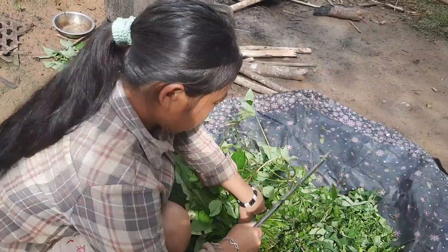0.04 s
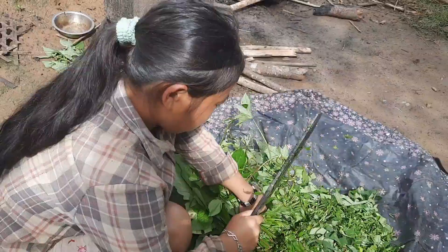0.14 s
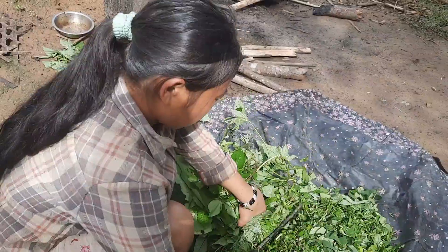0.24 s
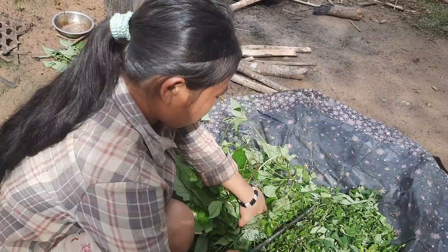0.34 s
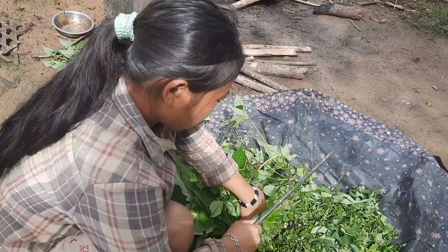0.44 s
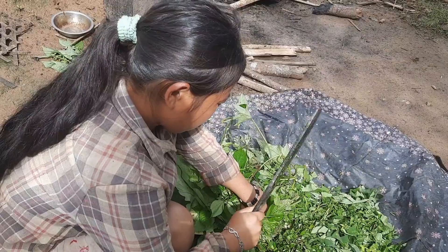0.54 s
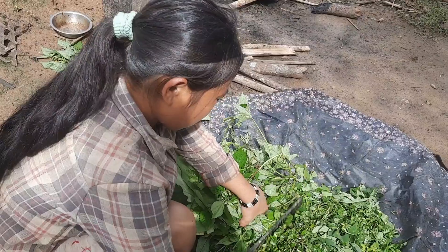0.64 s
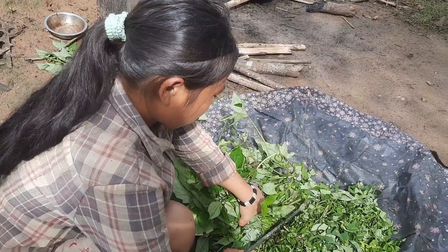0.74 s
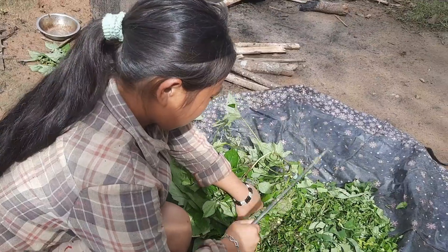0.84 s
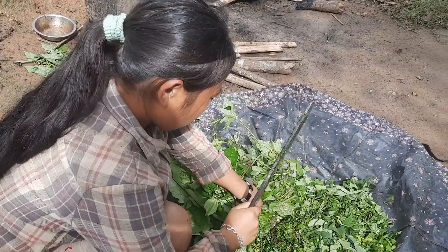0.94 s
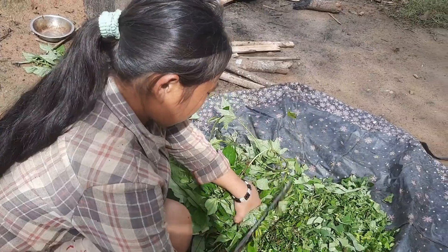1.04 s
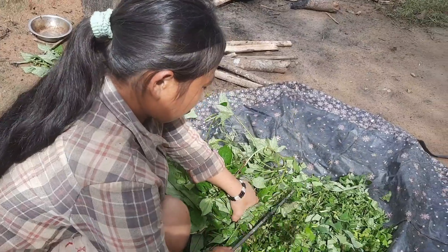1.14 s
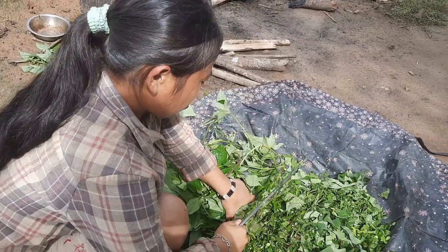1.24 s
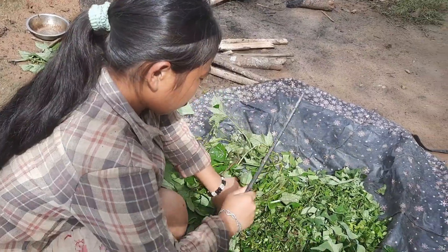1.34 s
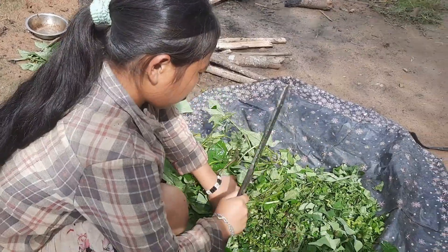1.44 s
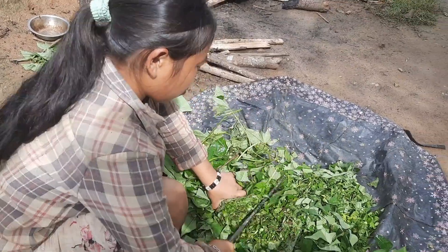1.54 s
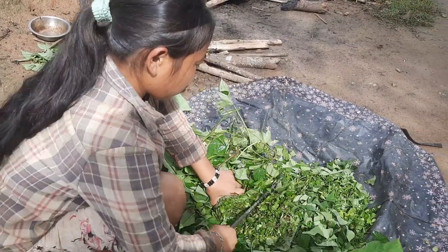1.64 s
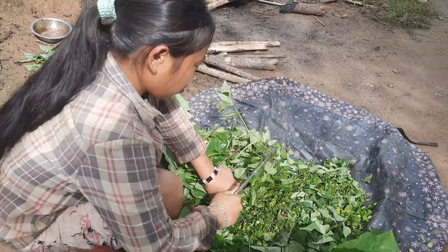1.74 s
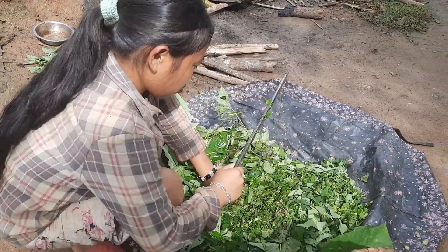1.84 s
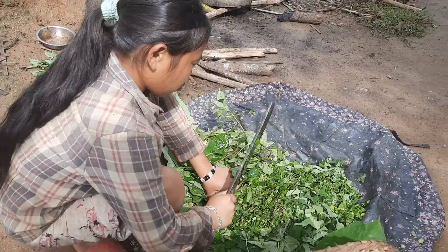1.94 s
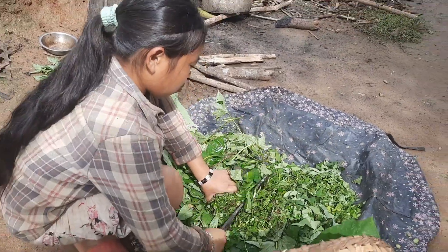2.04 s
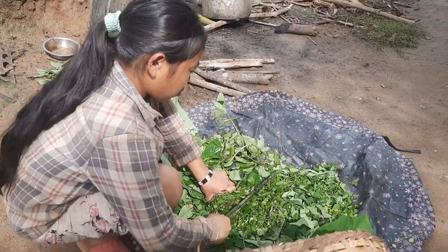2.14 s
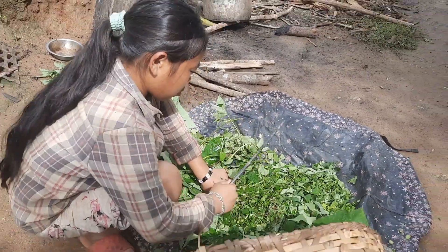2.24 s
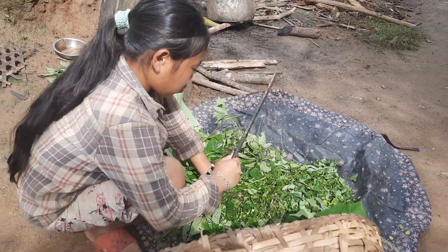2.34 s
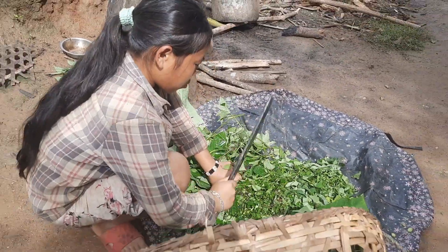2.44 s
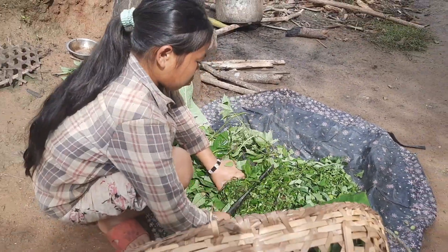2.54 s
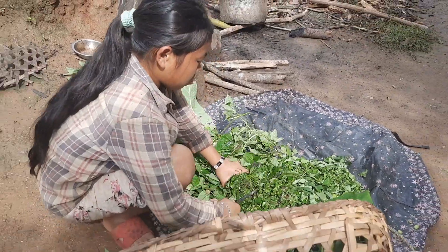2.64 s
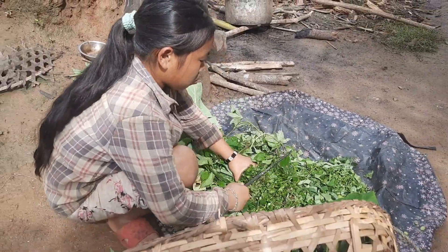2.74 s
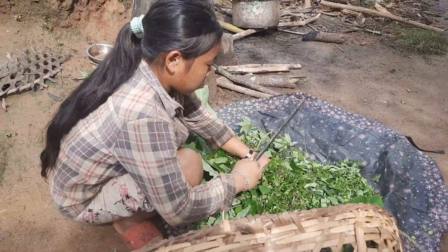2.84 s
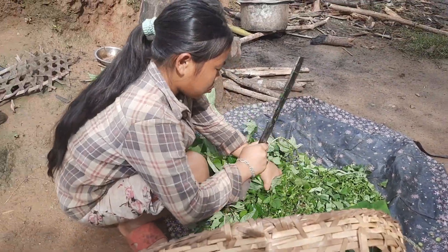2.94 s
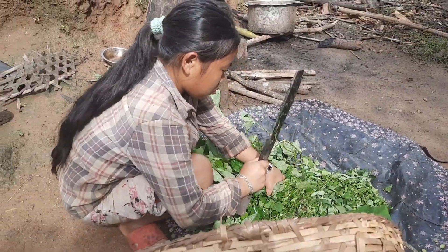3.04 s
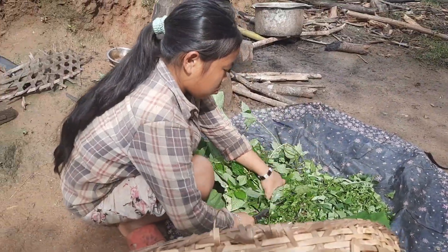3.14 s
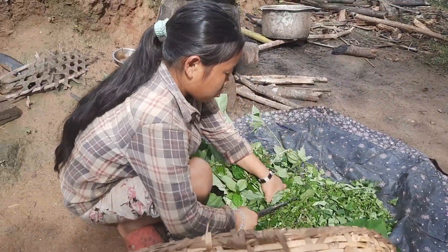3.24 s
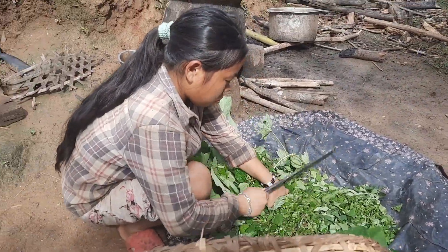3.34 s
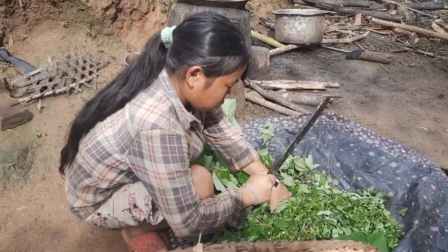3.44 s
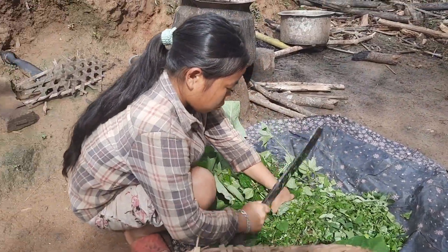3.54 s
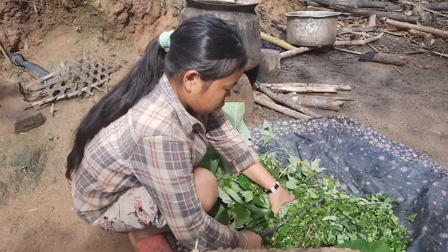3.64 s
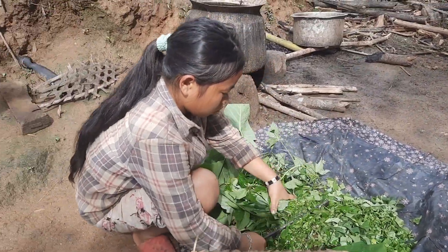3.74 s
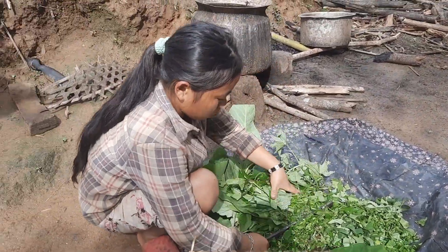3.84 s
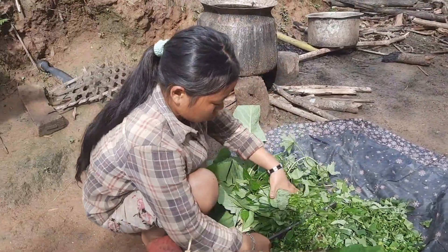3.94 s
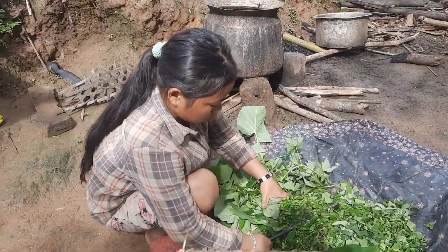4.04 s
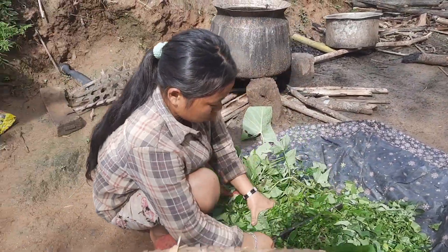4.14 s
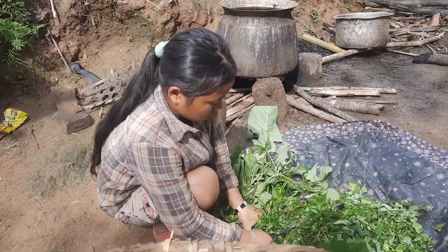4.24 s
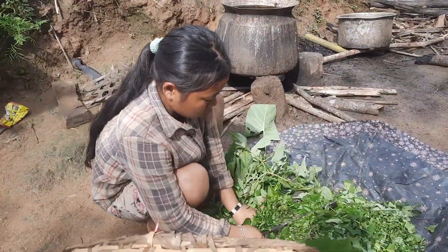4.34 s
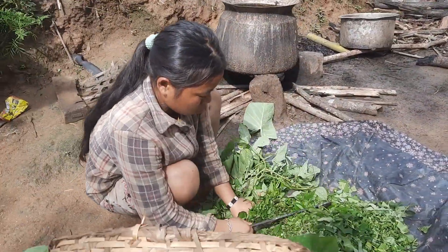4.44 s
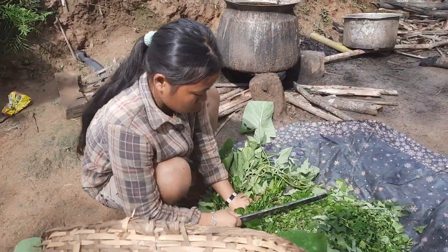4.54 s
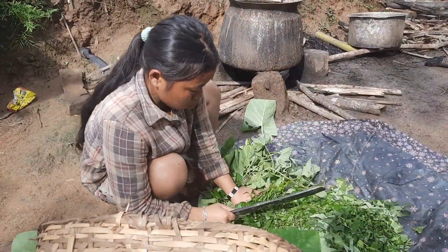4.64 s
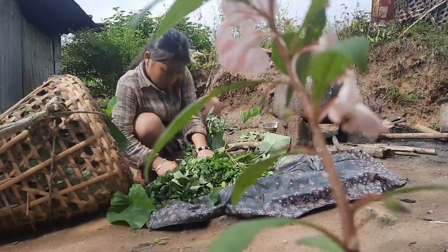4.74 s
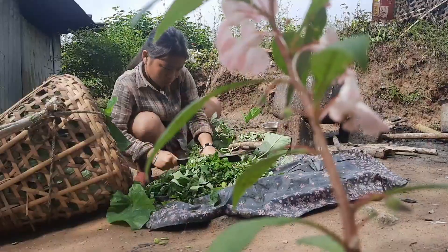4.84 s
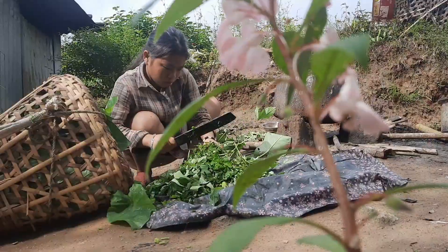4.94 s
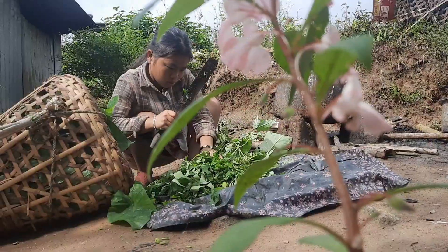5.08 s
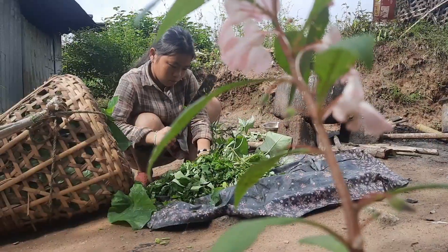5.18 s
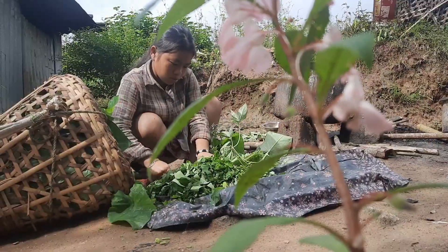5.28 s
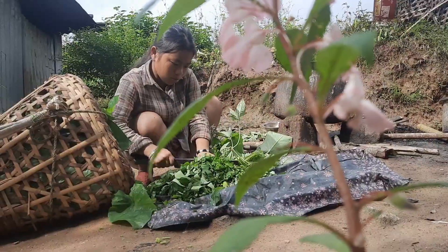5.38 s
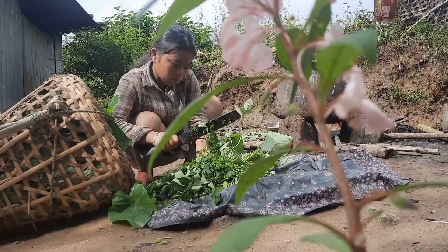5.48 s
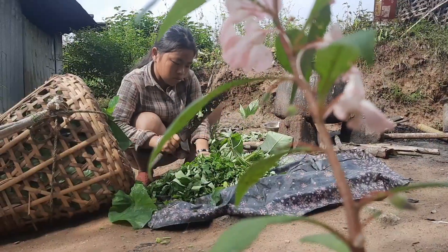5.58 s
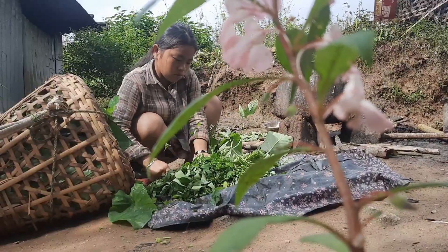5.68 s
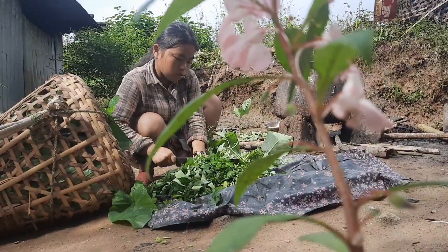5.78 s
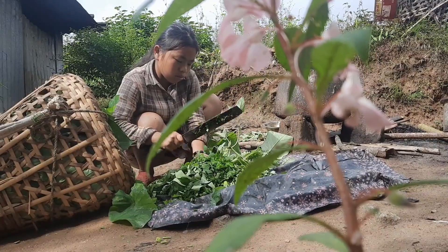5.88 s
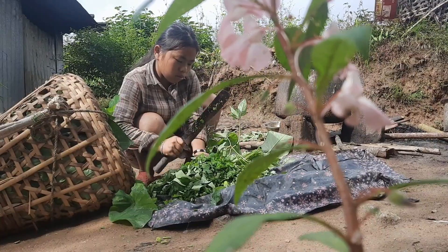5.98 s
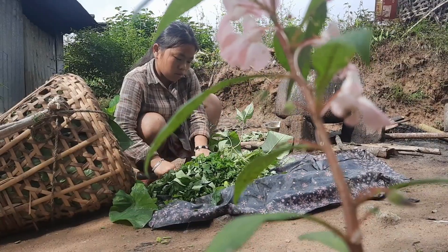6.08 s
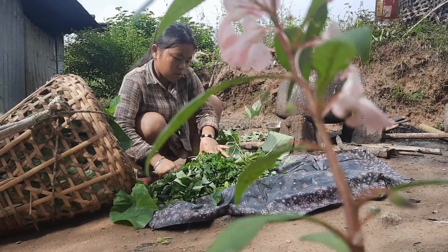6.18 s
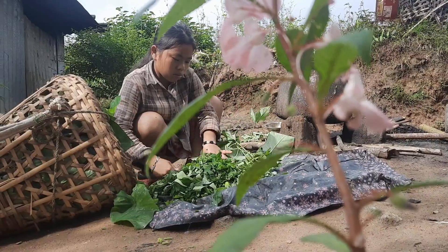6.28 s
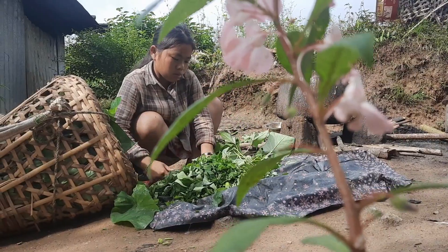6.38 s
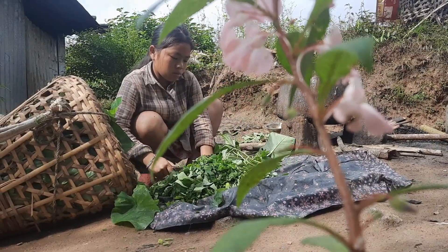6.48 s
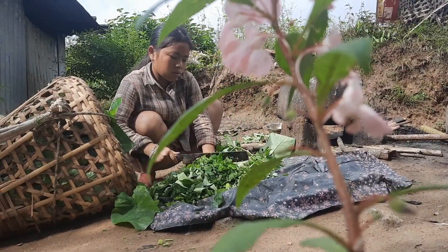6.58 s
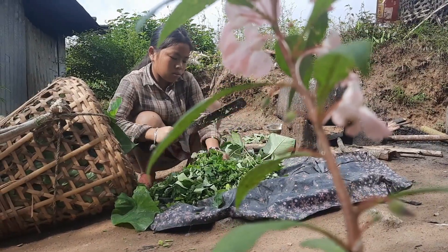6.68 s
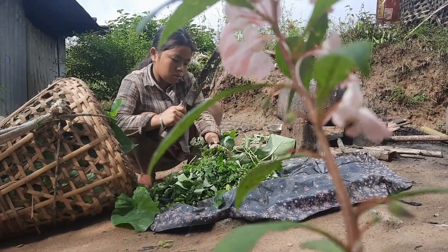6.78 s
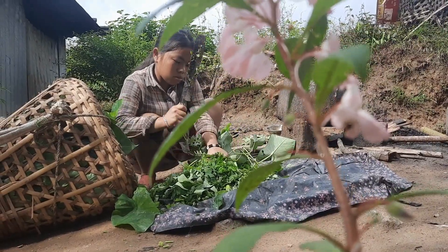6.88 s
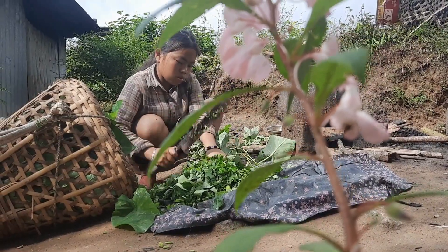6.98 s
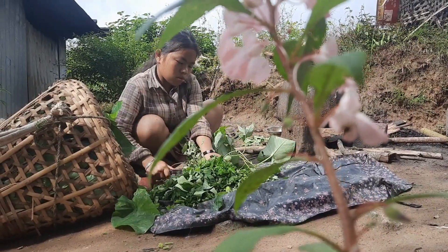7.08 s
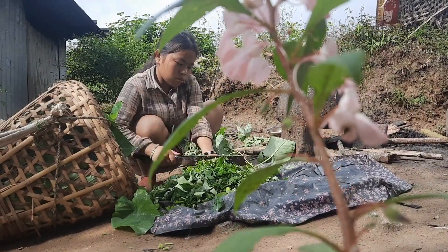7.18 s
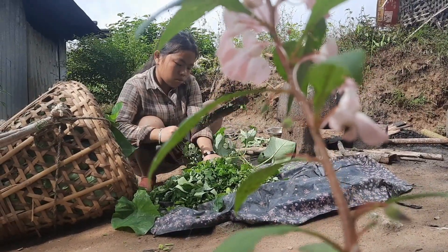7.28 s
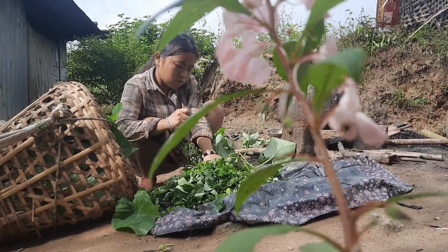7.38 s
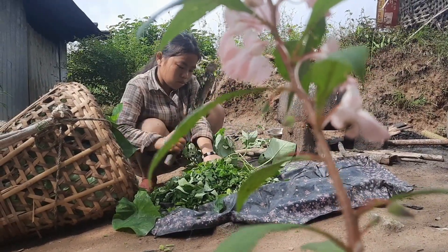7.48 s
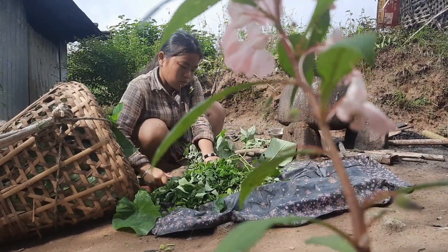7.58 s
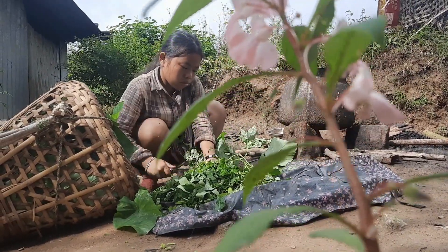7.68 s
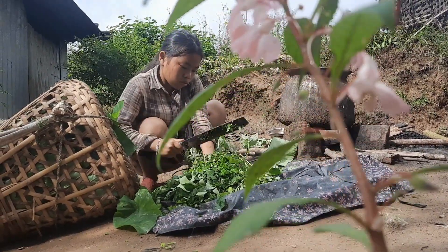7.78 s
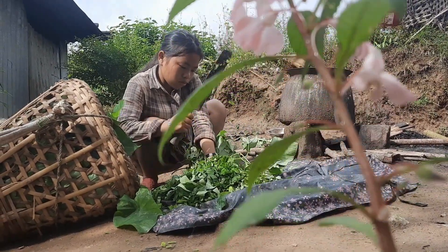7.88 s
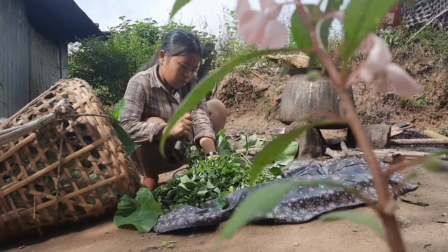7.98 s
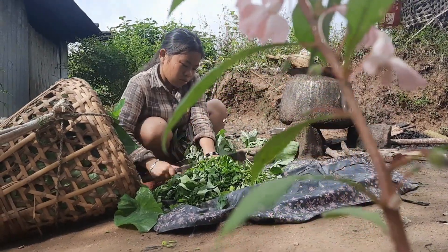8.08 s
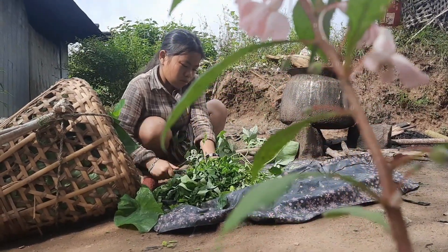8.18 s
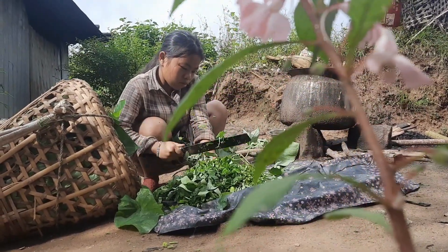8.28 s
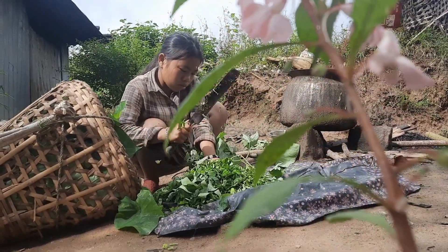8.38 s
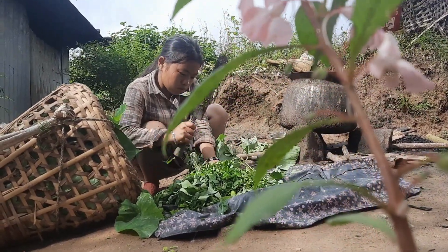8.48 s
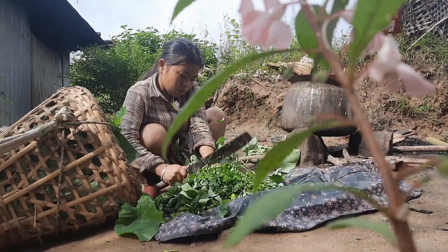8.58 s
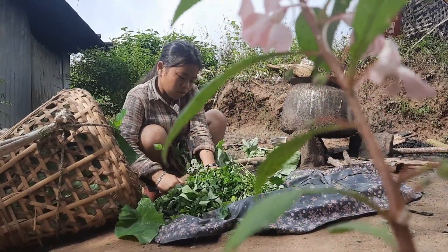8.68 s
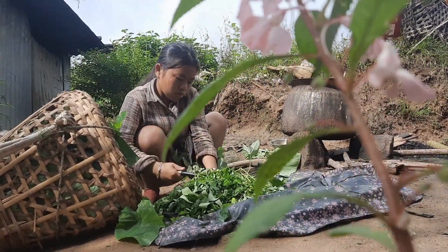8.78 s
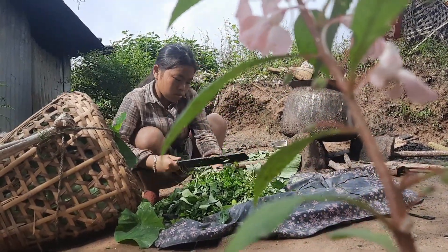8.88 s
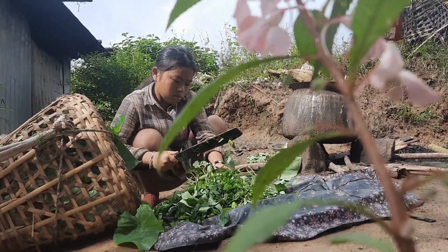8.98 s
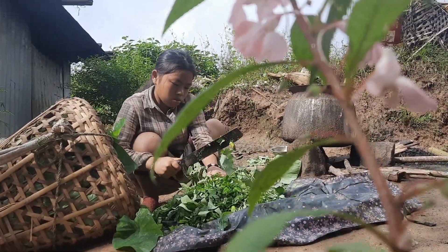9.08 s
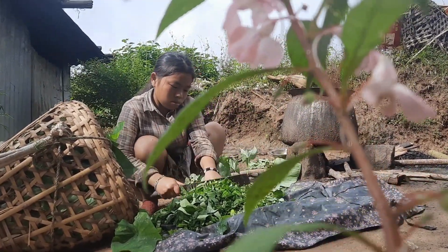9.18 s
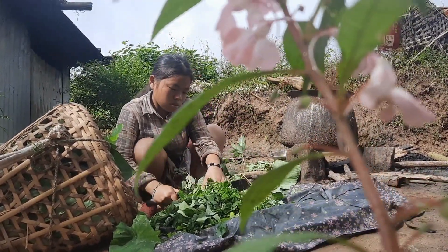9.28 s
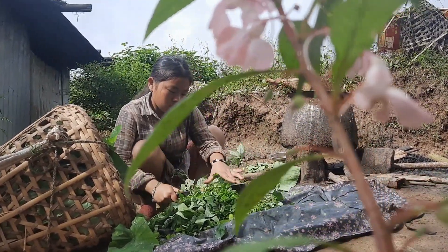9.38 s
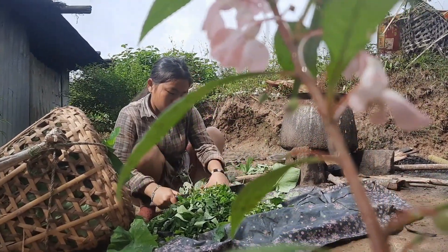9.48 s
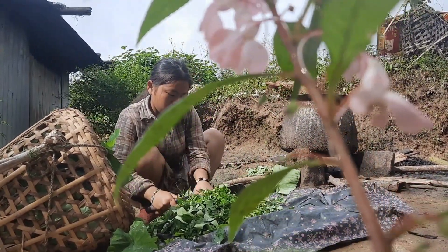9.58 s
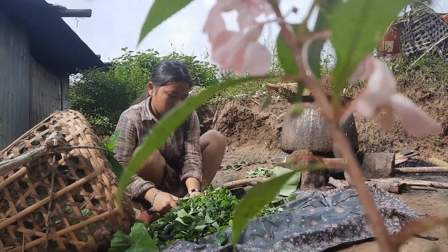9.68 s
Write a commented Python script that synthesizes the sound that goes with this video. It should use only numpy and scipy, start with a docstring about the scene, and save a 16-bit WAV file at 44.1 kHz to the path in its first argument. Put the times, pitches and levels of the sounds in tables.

```python
"""A long blade chops leafy stalks on a wooden board on a sheet, outdoors; air, insects and a low hum fill the yard.
First come nine strokes: filtered crackle crunches, damped sines ring board and blade, and cut leaves scatter.
A hand drags and rustles the heap between them too, more from about 4 s: swelling crackle, short ringing snaps,
and noise in narrow rings for the rubbed blade. At 4.65 s the microphone's lower, farther place recolours board,
blade scrape and heap. Three strokes follow from 5.4 s, four from 7.1 s, then the heap is moved to the end."""
import sys
import numpy as np
from scipy import signal
from scipy.fft import rfft, irfft, next_fast_len
from scipy.io import wavfile

SR = 44100
rng = np.random.default_rng(int(sys.argv[2]) if len(sys.argv) > 2 else 0)


def store_wav(level_fs):
    """Save 16-bit WAV to argv[1]."""
    pcm = np.round(np.clip(np.atleast_2d(level_fs), -1, 1) * 32767)
    wavfile.write(sys.argv[1], SR, pcm.T.astype(np.int16))


N = 428652
STEP = 16   # samples per step of the slow gain curves


def from_db(db):
    """Turn decibels into gain."""
    return 10 ** (np.asarray(db) / 20)


def rms_one(x):
    """Scale to an average (rms) strength of 1."""
    return x / np.sqrt(np.mean(x ** 2) + 1e-20)


def full(slow):
    """Stretch a slow gain curve to every sample."""
    return np.interp(np.arange(N) / STEP, np.arange(len(slow)), slow)


def at_hz(points, hz):
    """Read a table of (pitch, value) between its points, on a log pitch axis."""
    pitches, values = np.array(points).T
    return np.interp(np.log(hz), np.log(pitches), values)


def fft_hz(size):
    """Pitches of the spectrum bins, at least 1 Hz."""
    return np.maximum(np.arange(size // 2 + 1) * SR / size, 1)


def drift(rate_hz):
    """Slow random wandering of rms 1: noise smoothed by two equal low-pass stages."""
    r = np.exp(-2 * np.pi * STEP * rate_hz / SR)
    noise = rng.standard_normal(N // STEP + 3002)
    return rms_one(signal.lfilter([1], [1, -2 * r, r * r], noise)[3000:])   # drop the start-up


def ring(clicks, hz, t60):
    """A resonance: each unit click starts a sine of height 1 that loses 60 dB in t60 seconds."""
    r, w = from_db(-60 / (t60 * SR)), 2 * np.pi * hz / SR
    return signal.lfilter([0, np.sin(w)], [1, -2 * r * np.cos(w), r * r], clicks + 1e-18)


def mode(t, hz, t60):
    """One way a solid vibrates: a damped sine that swells during the contact."""
    contact_s = 0.00066
    t = np.maximum(t, 0)
    return (1 - np.exp(-t / contact_s)) ** 2 * from_db(-60 * t / t60) * np.sin(2 * np.pi * hz * t)


def narrow(source, hz, width_hz):
    """Pass a source twice through one resonance, then scale it to rms 1."""
    r = np.exp(-np.pi * width_hz / SR)
    stage = [0.94, 0.00049, -0.56, 1, -2 * r * np.cos(2 * np.pi * hz / SR), r * r]
    return rms_one(signal.sosfilt([stage] * 2, source))


def crackle(per_s, spread_db, hiss, count):
    """Uneven clicks of tearing fibres over hiss, in unrelated pairs of draws."""
    sizes = from_db(spread_db * np.minimum(rng.exponential(1, N), 4))
    born = rng.random(N) < per_s / SR
    strength = rms_one(rms_one(sizes * born) + hiss)
    return strength * rng.standard_normal((count, 2, N))


def swells(rows):
    """Each row rises 20 dB to its peak and falls 20 dB after it; powers add. One gain curve per level."""
    t, power = np.arange(N // STEP + 2) * STEP / SR, 0
    for peak_s, rise, fall, *levels_db in rows:
        away = np.maximum((peak_s - t) / max(rise, .005), (t - peak_s) / max(fall, .005))
        shape_db = -20 * np.minimum(away, 5)   # keeps going past 20 dB, down to 100 dB
        power = power + from_db(2 * (np.array(levels_db)[:, None] + shape_db))
    return np.sqrt(power)


# The knife strokes: (landing time [s], thud level [dB], high ring level [dB], knock level [dB],
#  low ring level [dB], hardness of bite [0-1], stalk crunch level [dB], leaf crunch level [dB],
#  scatter level [dB], blade pitch [Hz], dent pitch [Hz])
STROKES = [(0.1307, -33.5, -38, -27.5, -18, 0.23, -43, -44.5, -46, 616, 574),
           (0.347, -38.5, -35.5, -34, -33, 0.76, -33, -34, -43.5, 829, 302),
           (0.7479, -34.5, -22.5, -25, -16, 0.27, -28, -29.5, -41.5, 817, 313),
           (1.1528, -40.5, -32, -31, -25, 0.24, -28.5, -27.5, -42, 884, 298),
           (1.6339, -27.5, -10, -23.5, -19, 0.51, -42.5, -39, -39.5, 870, 312),
           (2.1009, -29, -12.5, -22.5, -13, 0.27, -48, -40, -45, 907, 312),
           (2.607, -29.5, -14, -24.5, -18, 0.4, -36, -37.5, -40, 768, 320.5),
           (3.24, -28, -13.5, -26, -17.5, 0.19, -42, -37.5, -43, 940, 321.3),
           (3.6965, -28.5, -15, -22.5, -9, 0.64, -38.5, -40.5, -40.5, 971, 312),
           (5.3571, -31.5, -22.5, -20, -23.5, 0.44, -39.5, -45, -49.5, 1165, 397),
           (5.776, -66.5, -34.5, -45.5, -40.5, 0.27, -42, -41, -46.5, 1280, 587),
           (6.1542, -30.5, -19.5, -23, -18.5, 0.19, -39, -49, -46.5, 614, 429),
           (7.1266, -37.5, -33, -36, -49.5, 0.28, -35, -38.5, -43, 695, 339.5),
           (7.6643, -27, -15, -20, -27.5, 0.44, -35.5, -44.5, -44, 1223, 483),
           (8.1979, -29.5, -19.5, -22, -33, 0.38, -34.5, -41.5, -43, 607, 448),
           (8.714, -27.5, -17.5, -19.5, -29, 0.44, -33, -46, -44, 563, 417)]
EDGE_DB, CRACK_DB = -7, -19   # edge modes and crack, over the high ring level


def strokes(name):
    """One named quantity for all strokes."""
    names = "s thud high knock low bite stalk leaf scatter blade_hz dent_hz".split()
    named = dict(zip(names, np.transpose(STROKES)))
    named.update(edge=named["high"] + EDGE_DB, crack=named["high"] + CRACK_DB)
    return named[name]


def dying(name, t60):
    """Each landing starts a gain that fades by 60 dB in t60 seconds."""
    train = np.zeros(N // STEP + 2)
    train[np.round(strokes("s") * SR / STEP).astype(int)] = from_db(strokes(name))
    return signal.lfilter([1], [1, -from_db(-60 * STEP / (t60 * SR))], train)


# Colour of the still air: (pitch [Hz], level per Hz [dB]); only its shape counts
AIR_COLOUR = [(18, -37.5), (30, -9), (90, 1), (131, 2.5), (221, -11), (295, -4.5), (760, -15.5),
              (1160, -18.5), (3580, -24), (6900, -16.5), (9460, -26), (14800, -19.5), (16000, -42)]
AIR_DB = -73
# Insect voices: (pitch [Hz], resonance width [Hz], level at start [dB], level at end [dB])
INSECT_BANDS = [(5400, 630, -82, -87.5), (7000, 550, -87.5, -97), (8270, 250, -84, -96),
                (11010, 420, -96.5, -93)]
# Swells of rumble, low hum and rubbed blade: (peak time [s], rise [s], fall [s], level [dB])
RUMBLE_SWELLS = [(4.192, 0.15, 0.046, -49.5), (4.34, 0.12, .3, -63), (4.712, 0.045, 0.11, -61.5),
                 (9.71, .06, 0.08, -65.5)]
LOW_HUM_SWELLS = [(4.043, .3, 0.51, -66), (4.338, 0.27, 0.16, -57), (7.021, 0.14, .2, -69)]
BLADE_RUB_SWELLS = [(1.0, .1, 0.053, -68), (1.5, .3, 0.11, -74.5), (5.12, .2, 0.29, -73),
                    (5.77, .06, 0.093, -72), (6.85, .3, 0.29, -72.5), (7.495, .15, 0.092, -60.5),
                    (8.0, .3, 0.28, -68.5), (8.5, .2, 0.76, -69.5), (9.06, .3, 0.24, -76.5),
                    (9.312, .12, 0.32, -64)]
# (pitch [Hz], resonance width [Hz], resting level [dB], swells)
LOW_VOICES = [(63.4, 44, -80, RUMBLE_SWELLS),
              (100.85, 14, -79.5, LOW_HUM_SWELLS),
              (303.3, 37, -82.5, BLADE_RUB_SWELLS)]   # low ring of the rubbed blade


def yard_and_low_blade_ring():
    """Coloured noise for air; narrow wavering noise for insects, rumble, a low hum and the blade's low ring."""
    air = irfft(rfft(rng.standard_normal((2, N))) * from_db(at_hz(AIR_COLOUR, fft_hz(N))), N)
    voices = []
    for hz, width, first_db, last_db in INSECT_BANDS:
        level_db = np.linspace(first_db, last_db, N // STEP + 2)
        voices.append((hz, width, from_db(level_db + 1.5 * drift(8))))
    for hz, width, rest_db, rows in LOW_VOICES:
        resting = from_db(rest_db + 1.5 * drift(6.5))
        voices.append((hz, width, np.hypot(resting, swells(rows)[0])))
    white = rng.standard_normal((2, N))
    out = full(from_db(AIR_DB + 0.88 * drift(6.1))) * rms_one(air)
    return out + sum(full(gain) * narrow(white, hz, width) for hz, width, gain in voices)


# Three rings of the rubbed blade: (pitch [Hz], resonance width [Hz])
SCRAPE_RINGS = [(625, 70), (1220, 270), (2170, 150)]
# Scrapes of the blade: (peak time [s], rise [s], fall [s], low, middle and high of the three levels [dB])
SCRAPE_SWELLS = [(1.4, 0.23, 0.38, -89, -70, -63.5), (4.03, 0.73, 0.26, -91, -72, -78.5),
                 (4.25, .2, 0.26, -78, -62, -62.5), (4.75, 0.12, 0.51, -83.5, -69.5, -65.5),
                 (6.4, 0.04, 0.14, -81, -65, -84), (6.72, 0.3, 0.3, -80, -63, -85),
                 (6.82, 0.071, 0.13, -64, -73, -83), (8.84, 0.062, 0.15, -76, -67, -80),
                 (9.06, 0.21, 0.27, -69, -63, -74.5), (9.3, .06, 0.15, -68.5, -65.5, -76)]


def blade_scrape():
    """The blade is rubbed and scraped: noise wakes three narrow blade rings, each with unsteady swells."""
    white, out = rng.standard_normal((2, N)), 0
    for gain, (hz, width) in zip(swells(SCRAPE_SWELLS), SCRAPE_RINGS):
        out = out + full(gain * from_db(3.3 * drift(15))) * narrow(white, hz, width)
    return out


def faint_snaps(count):
    """Chance snaps, likelier and louder where the stalks rustle most."""
    over_rustle_db, middle_hz = 6.5, 2600
    stalks = swells(RUSTLE_SWELLS)[0]
    when, size, pitch = rng.random((count, 3)).T
    at = np.searchsorted(np.cumsum(stalks), when * stalks.sum())
    at = np.minimum(at, len(stalks) - 60)   # room for the last snap
    peak_db = 20 * np.log10(stalks[at]) + over_rustle_db + 8.0 * (size - .5)
    return list(zip(at * STEP / SR, peak_db, middle_hz * 4.0 ** (pitch - .5), np.full(count, 6.0)))


# Stalks snapping: (time [s], level before a 2 dB lift [dB], pitch [Hz], left minus right [dB])
STALK_SNAPS = [(0.453, -39, 1670, 7), (0.884, -46, 1000, 2), (0.915, -49, 930, 3), (0.978, -50, 940, 3),
               (1.01, -51, 1090, 9), (1.365, -48, 1280, 5), (1.438, -44, 1200, 5), (1.521, -51, 915, 2.5),
               (3.985, -55, 2600, 3.5), (4.279, -42, 2390, 3), (4.854, -50.5, 1720, -3),
               (8.449, -57.5, 1193, 4.5), (0.992, -43, 1400, 6), (1.381, -46, 1220, 7),
               (1.392, -44.5, 1135, 1), (1.453, -38, 1480, 6), (1.456, -43, 780, 4), (1.492, -33, 1210, 7),
               (1.496, -39, 1090, 0), (1.704, -43, 1150, 4.0), (1.731, -39.5, 1205, 9),
               (2.062, -49.5, 5800, -1), (2.416, -48.5, 7230, 12.5), (2.447, -43, 11700, 11.5),
               (2.487, -48, 3234, 8.5), (2.526, -44, 3500, 10.5), (3.144, -35.5, 2380, 5),
               (4.427, -47, 3300, 4), (4.82, -36, 1900, 8), (5.084, -48, 2130, 4.5), (5.123, -48, 1190, 1),
               (7.406, -15.5, 8300, 31), (8.098, -48.5, 8200, 12), (8.294, -35, 1326, 7),
               (9.303, -39.5, 920, 0), (0.504, -52, 8900, 10), (9.424, -50, 10000, 13),
               (9.484, -58.5, 7100, 10), (9.532, -47, 7160, 12), (9.57, -32.5, 7000, 23),
               (9.631, -35, 7200, 12), (9.411, -50.5, 7540, 10), (9.375, -55, 3980, 8.5),
               (0.958, -51, 1800, 6), (0.97, -51, 2600, 5), (6.8, -48, 3400, 5)]
CRISP, CRISP_S = 0.16, 0.00065   # dry click mixed into the ringing part: gain, fading time constant [s]


def snaps():
    """A breaking stalk rings for a few rough cycles; close to one side's port it is a full-band tick."""
    out, t = np.zeros((2, N)), np.arange(800) / SR
    rows = STALK_SNAPS + faint_snaps(count=30)
    noises = rng.standard_normal((len(rows), len(t)))
    for (s, peak_db, hz, pan_db), noise in zip(rows, noises):
        tick = 3.0 * (t == 0) + 0.22 * noise * np.exp(-t / 0.00079)
        body = ring(noise * np.exp(-t / .001), hz, 8 / hz + 0.0006)
        crisp_body = body / np.abs(body).max() + CRISP * noise * np.exp(-t / CRISP_S)
        close = np.clip(abs(pan_db) / 30, 0, 1) ** 2   # strong panning counts as close
        snap = close * tick + (1 - close) * crisp_body
        sides = from_db(peak_db + 2.0 + np.minimum(0, [[pan_db], [-pan_db]]))
        at = round(s * SR)
        out[:, at:at + len(t)] += sides * snap
    thin = signal.butter(2, 210, "high", fs=SR, output="sos")
    return signal.sosfilt(thin, out + 1e-18)


AFTER_T60_S, AFTER_DRAG_DB, AFTER_RUSTLE_DB = .5, -17.5, -15   # settling after a stroke, over scatter level
# The heap pushed over the sheet: (peak time [s], rise [s], fall [s], drag level [dB], heap level [dB])
DRAG_SWELLS = [(.455, .03, 0.12, -73, -86), (.918, 0.04, .04, -66, -65), (.998, 0.072, 0.065, -60, -73),
               (1.41, 0.056, 0.084, -53.5, -79), (1.485, 0.066, .12, -55.5, -53.5),
               (2.92, 0.18, 0.22, -67, -73), (4.194, 0.13, 0.13, -58, -74.5),
               (4.32, 0.24, 0.073, -56.5, -74), (4.52, .06, 0.17, -64, -82.5),
               (4.77, 0.077, 0.23, -61, -79), (5.12, 0.06, 0.14, -58, -57.5),
               (5.21, .15, 0.079, -60, -64.5), (6.412, 0.06, 0.14, -62, -74),
               (6.75, 0.36, 0.12, -58.5, -74.5), (6.8, 0.055, 0.23, -62.5, -62),
               (7.433, 0.023, .07, -70.5, -70), (8.32, 0.026, 0.034, -67, -72),
               (8.834, 0.051, 0.09, -58, -60.5), (9.07, 0.054, 0.24, -62, -64),
               (9.302, 0.048, 0.11, -59.5, -55), (9.71, 0.21, 0.086, -58, -62)]
# The hand in the greens: (peak time [s], rise [s], fall [s], stalk level [dB], leaf level [dB])
RUSTLE_SWELLS = [(.47, 0.029, 0.16, -67, -70), (.998, 0.083, .07, -65, -72), (1.45, 0.24, 0.19, -57, -62.5),
                 (2.37, 0.125, 0.13, -72.5, -64.5), (2.495, 0.13, 0.27, -65, -55.5),
                 (2.57, 0.16, 0.052, -58.5, -61), (2.9, 0.19, 0.25, -59, -61),
                 (3.146, .006, .05, -59.5, -57), (3.49, 0.23, 0.11, -67, -67), (4.056, 0.2, .1, -69, -67.5),
                 (4.18, 0.081, 0.41, -54.5, -60), (4.34, 0.45, 0.28, -60, -61),
                 (4.5, 0.06, 0.34, -60.5, -65), (4.756, 0.072, 0.055, -58, -54.5),
                 (4.82, 0.094, 0.11, -58.5, -59), (5.06, .3, 0.13, -57, -59.5),
                 (5.21, 0.31, 0.095, -65, -62.5), (6.412, .07, 0.15, -72.5, -63),
                 (6.79, 0.28, 0.21, -63, -63), (8.9, .1, 0.085, -69, -70.5), (9.07, 0.13, 0.41, -66.5, -68),
                 (9.302, 0.05, 0.091, -56.5, -56), (9.63, 0.3, 0.38, -69, -63)]


def handling():
    """Gains of sheet, heap, stalks and leaves: hand movements plus the heap settling after strokes."""
    after = dying("scatter", AFTER_T60_S)
    drag, heap = np.hypot(swells(DRAG_SWELLS), from_db(AFTER_DRAG_DB) * after)
    stalks, leaves = np.hypot(swells(RUSTLE_SWELLS), from_db(AFTER_RUSTLE_DB) * after)
    return drag, heap, stalks, leaves


# Resonances of the dragged sheet: (pitch [Hz], resonance width [Hz], level [dB])
SHEET_RINGS = [(956.7, 1500, -8), (1280, 510, -3.5)]


def dragged_sheet(drag):
    """The sheet sticks and slips: sparse pops through two wide resonances."""
    pops = crackle(per_s=310.0, spread_db=7.0, hiss=1.6, count=1)[0]
    rings = sum(from_db(db) * narrow(pops, hz, width) for hz, width, db in SHEET_RINGS)
    return full(drag * from_db(0.6 * drift(40))) * rings


CUT_S, BITE_SHORTENS_S = 0.029, 0.017   # time through the bundle; a hard bite is quicker
CRUNCH_T60_S = 0.035


def cutting(name):
    """Crunch swells as the blade enters the bundle (early if it bites hard) and dies after landing."""
    out = dying(name, CRUNCH_T60_S)
    for s, bite, level_db in zip(strokes("s"), np.clip(strokes("bite"), .05, 1), strokes(name)):
        land = round(s * SR / STEP)
        span = round(max(CUT_S - BITE_SHORTENS_S * bite, .003) * SR / STEP)
        depth = np.arange(span) / span
        missing = np.maximum(1 - depth / (1.05 - bite), 0) ** 1.1
        out[land - span:land] = from_db(level_db - 33 * missing)
    return out


# Colours, only the shape counts: (pitch [Hz], level per Hz [dB])
# Crunching stalks and leaves, then rubbed stalks and leaves
STALK_COLOUR = [(150, -28.5), (500, -6.5), (1000, 2), (2000, -3), (3500, -16), (6000, -28)]
LEAF_COLOUR = [(1000, -11), (2500, -2), (5000, -0.5), (7000, 0), (10000, -11), (13500, -4), (16000, -4)]
STALK_RUB_COLOUR = [(900, -19.5), (1800, -2.5), (2300, -1.5), (3500, -5), (5000, -17.5)]
LEAF_RUB_COLOUR = [(2500, -26), (4000, 0), (5500, -0.5), (8000, -2.5), (10000, -7.5), (13500, -4.5),
                   (16000, -6)]
# Shifting heap, crack at landing, scattering cut leaves and low rattle, columns as above
HEAP_COLOUR = [(200, -14), (400, -8), (640, -7), (900, -6.5), (1300, -30)]
CRACK_COLOUR = [(1500, -19.5), (2500, 0.5), (5000, -4), (9000, -13), (15000, -13)]
SCATTER_COLOUR = [(300, -13.5), (700, -3.5), (1500, -6), (3000, 1), (6000, -6), (10000, -7.5),
                  (13500, -4.5), (16000, -8)]
RATTLE_COLOUR = [(60, -12), (100, 0), (200, -6), (400, -3.5), (800, -6.5), (1500, -14.5), (3000, -41)]
# How long scatter and rattle last: (pitch [Hz], time to fall 60 dB [s])
SETTLE_TIMES = [(60, .22), (160, 0.38), (420, 0.18), (1100, .2), (3000, 0.17), (8000, 0.22), (15000, 0.04)]
CRACK_T60_S, RATTLE_DB = .02, -3   # rattle over the thud level


def greens():
    """Bands of crackle; powers of crunch, crack, scatter, rattle and handling add in each band."""
    edges = 45 * 2 ** np.arange(0, 8.8, .4)
    centres = np.sqrt(edges[1:] * edges[:-1])

    def share(colour, hz):
        """The part of a colour's total power that falls in one band."""
        total = np.sum(from_db(2 * at_hz(colour, centres)) * centres)
        return from_db(2 * at_hz(colour, hz)) * hz / total

    drag, heap, stalks, leaves = handling()
    shuffle = from_db(1.9 * drift(25))     # leaves move in clumps
    steady = [(STALK_COLOUR, cutting("stalk")), (LEAF_COLOUR, cutting("leaf")),
              (STALK_RUB_COLOUR, stalks * shuffle), (LEAF_RUB_COLOUR, leaves * shuffle),
              (HEAP_COLOUR, heap * from_db(3.2 * drift(30))), (CRACK_COLOUR, dying("crack", CRACK_T60_S))]
    lumps = from_db(2.4 * drift(45))       # cut pieces land unevenly
    grains = crackle(per_s=3000.0, spread_db=1.5, hiss=1.6, count=2)
    out = dragged_sheet(drag)
    for k, hz in enumerate(centres):
        power = sum(share(colour, hz) * gain ** 2 for colour, gain in steady)
        t60 = at_hz(SETTLE_TIMES, hz)
        power += share(SCATTER_COLOUR, hz) * (lumps * dying("scatter", t60)) ** 2
        power += share(RATTLE_COLOUR, hz) * from_db(2 * RATTLE_DB) * (lumps * dying("thud", t60)) ** 2
        band_filter = signal.butter(2, edges[k:k + 2], "band", fs=SR, output="sos")
        band = signal.sosfilt(band_filter, grains[k % 2])   # neighbours use different grains
        out = out + full(np.sqrt(power) * from_db(0.51 * drift(20))) * rms_one(band)
    return out


# Board modes: (middle pitch [Hz], middle level over the stroke [dB], time to fall 60 dB [s],
#  name of the stroke level that drives the mode)
BOARD_MODES = [(85.96, -5.5, 0.22, "thud"), (122.4, 2, 0.11, "thud"), (171.1, 5, 0.054, "knock"),
               (270.6, -11, 0.098, "low"), (312, 0, 0.088, "knock"), (477, -1, 0.023, "knock"),
               (719, 5.5, 0.012, "edge"), (869, 4, 0.027, "knock"), (1150, 0.5, 0.034, "high"),
               (1810, -2.5, 0.014, "edge"), (1997, 2.5, 0.025, "edge")]
# Faint ringing-on of the blade after some strokes: (time [s], pitch [Hz], level [dB], time to fall 60 dB [s])
BLADE_LINGER = [(2.106, 940, -42.5, 0.27), (7.14, 2060, -67.5, 0.48), (8.712, 1150, -58, 0.64)]
REBOUND_S, REBOUND_DB, REBOUND_HZ = .0062, -10, 233   # slap back on the ground; weaker above this pitch
BLADE_DB, BLADE_T60_S = 16, 0.011   # the blade's short ring, over the high ring level
DENT_DB, DENT_T60_S = 14, 0.02      # the dull dent into wood, over the knock level


def board():
    """Blade, dent and board modes ring, the board's a little detuned by leaves; the slap back adds low ones."""
    out, t = np.zeros(N), np.arange(SR // 4) / SR
    chance = rng.standard_normal((len(STROKES), 2, len(BOARD_MODES)))
    for i, (detune, strength) in enumerate(chance):
        blow = -from_db(strokes("high")[i] + BLADE_DB) * mode(t, strokes("blade_hz")[i], BLADE_T60_S)
        blow -= from_db(strokes("knock")[i] + DENT_DB) * mode(t, strokes("dent_hz")[i], DENT_T60_S)
        for k, (hz, level_db, t60, group) in enumerate(BOARD_MODES):
            hz = hz * (1 + 0.07 * detune[k])
            slap = from_db(REBOUND_DB) / (1 + (hz / REBOUND_HZ) ** 2)
            swing = slap * mode(t - REBOUND_S, hz, t60) - mode(t, hz, t60)
            blow += from_db(strokes(group)[i] + level_db + 2.1 * strength[k]) * swing
        at = round(strokes("s")[i] * SR)
        out[at:at + len(t)] += blow
    for s, hz, level_db, t60 in BLADE_LINGER:
        since = np.clip(np.arange(N) / SR - s, 0, 1)
        out += from_db(level_db) * mode(since, hz, t60)
    return out


# How alike left and right are: (pitch [Hz], likeness [0-1])
PORT_LIKENESS = [(60, 0.77), (500, 0.69), (1000, 0.83), (2400, 0.37), (6000, 0.067), (15000, 0.24)]
# Level difference of the ports: (pitch [Hz], left minus right [dB])
PORT_LEVELS = [(60, -1), (99, 1), (160, 1.5), (270, 1.5), (450, 3.5), (740, 2.0), (1220, 4.5), (2010, 4.5),
               (3330, 3), (5500, -6.5), (9080, 4.0), (15000, 3.5)]
# Phase difference of the ports: (pitch [Hz], phase by which left leads [rad])
PORT_PHASES = [(0, 0), (860, 0.13), (1380, -1.5), (1980, 0.9), (3960, -1.74), (4480, 0.5), (6980, 4),
               (10300, 8.5), (11500, 4), (12300, 7.5), (13700, 8), (16300, 21)]


def ports(shared, own):
    """Two close ports hear a shared part and an unshared part, each port with its own colour and phase."""
    size = next_fast_len(N)
    hz = fft_hz(size)
    alike = np.clip(at_hz(PORT_LIKENESS, hz), 0, 1)
    half = from_db(at_hz(PORT_LEVELS, hz) / 2) * np.exp(.5j * at_hz(PORT_PHASES, hz))
    mid = np.sqrt((1 + alike) / 2) * rfft(shared, size)
    side = np.sqrt((1 - alike) / 2) * rfft(own, size)
    return irfft([(mid + side) * half, (mid - side) / half], size)[:, :N]


# Colour at the lower, farther microphone place: (pitch [Hz], level [dB])
FAR_COLOUR = [(40, -5), (100, 0.5), (250, -1), (1300, 1), (3000, -1), (8000, -0.5), (14000, -1.5)]
FAR_S = 4.65   # the microphone is lower and farther off from here on


def farther(x):
    """From FAR_S on, filter the sound with the colour of the farther microphone place."""
    size = next_fast_len(N)
    late = x * (np.arange(N) >= FAR_S * SR)
    colour = from_db(at_hz(FAR_COLOUR, fft_hz(size)))
    return x - late + irfft(rfft(late, size) * colour, size)[..., :N]


def scene():
    """Board, greens and scrape reach both ports; snaps are panned; yard and low blade ring are more diffuse."""
    heap, around = greens() + blade_scrape(), yard_and_low_blade_ring()
    left = around[0] + 0.21 * around[1]
    right = 0.71 * (around[0] - 1.0 * around[1])
    near = farther(ports(board() + heap[0], heap[1]))
    return near + snaps() + np.array([left, right])


def record(dry):
    """Roll off the bass below 60 Hz and cut the top steeply, 70 dB down from 16500 Hz."""
    dry = signal.sosfilt(signal.butter(3, 60, "high", fs=SR, output="sos"), dry)
    return signal.sosfilt(signal.cheby2(12, 70, 16500, fs=SR, output="sos"), dry)


dry = scene()
out = record(dry)
store_wav(out)
```